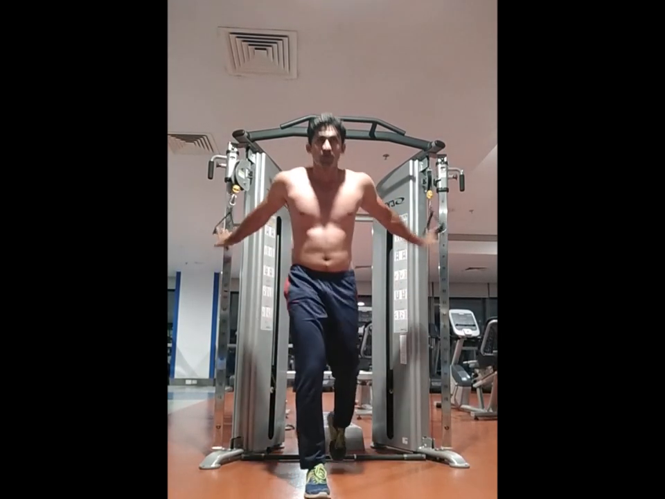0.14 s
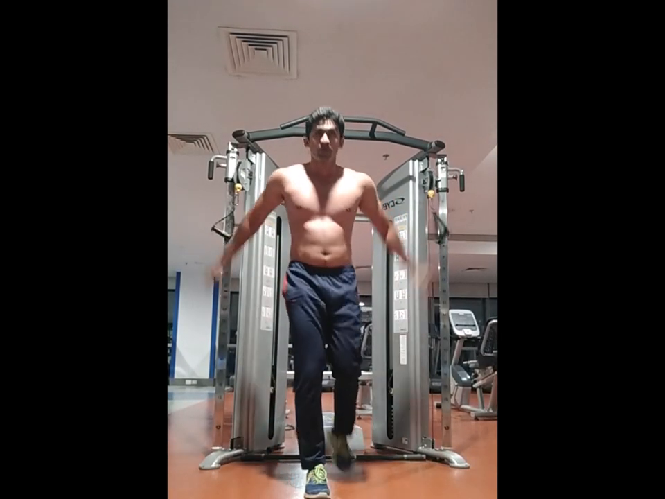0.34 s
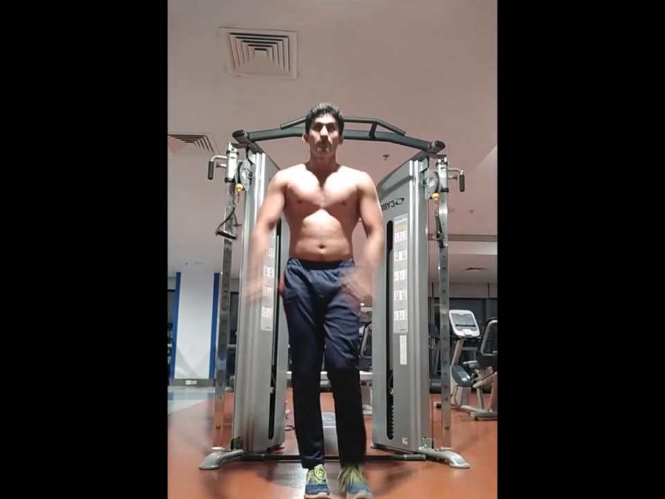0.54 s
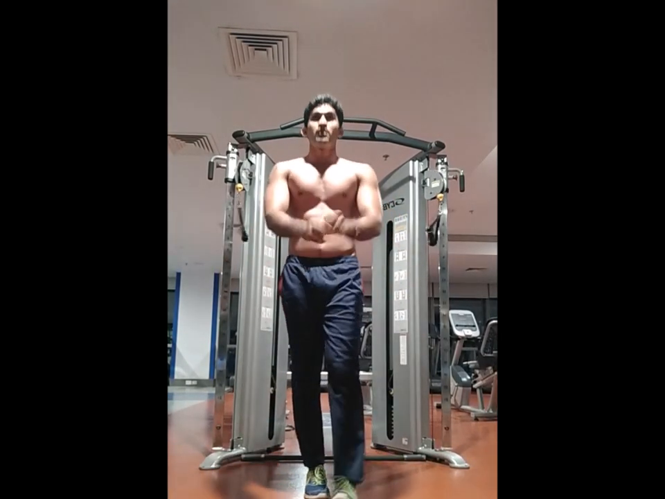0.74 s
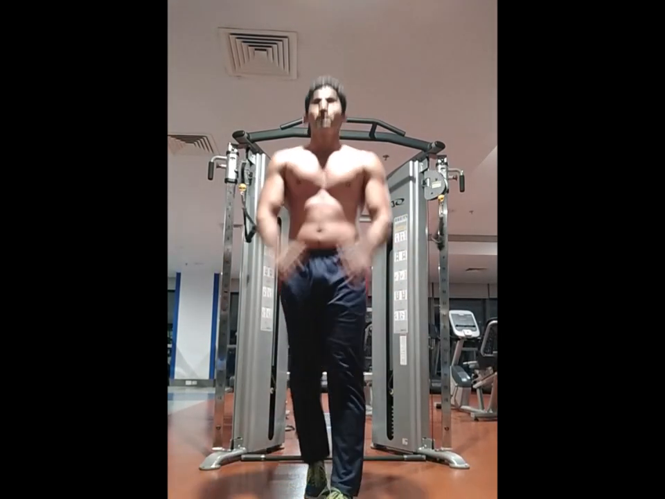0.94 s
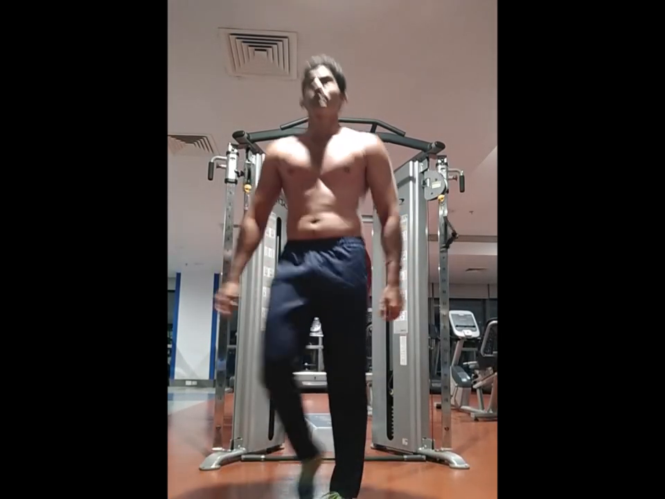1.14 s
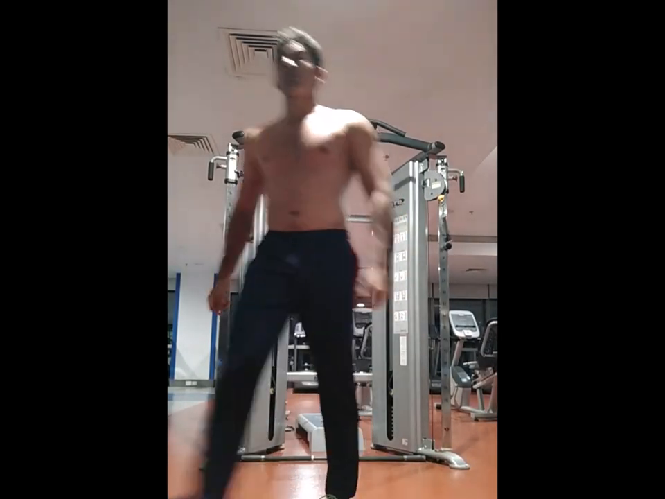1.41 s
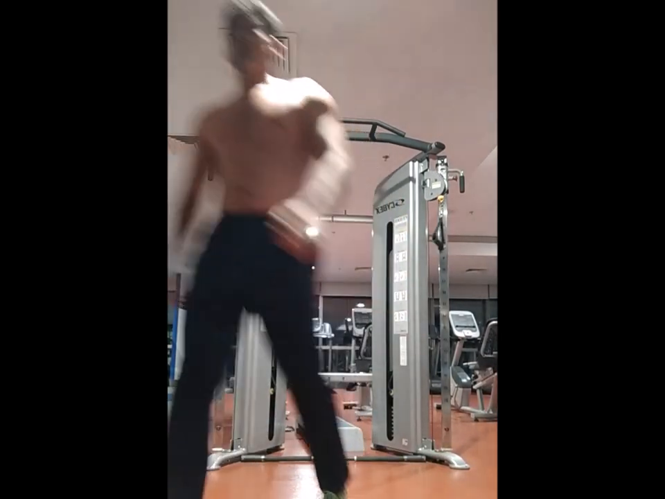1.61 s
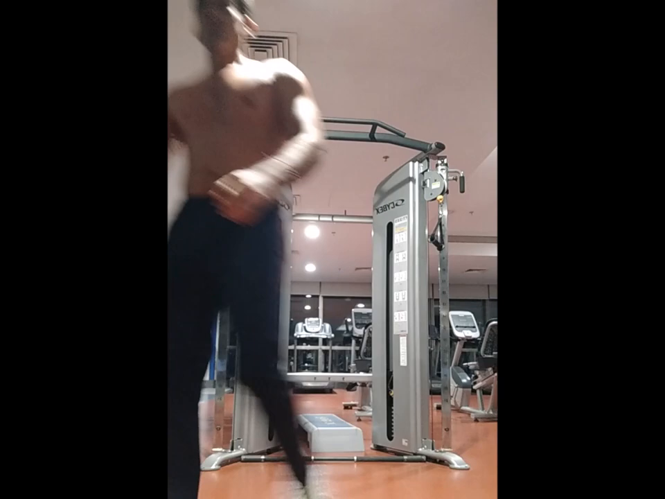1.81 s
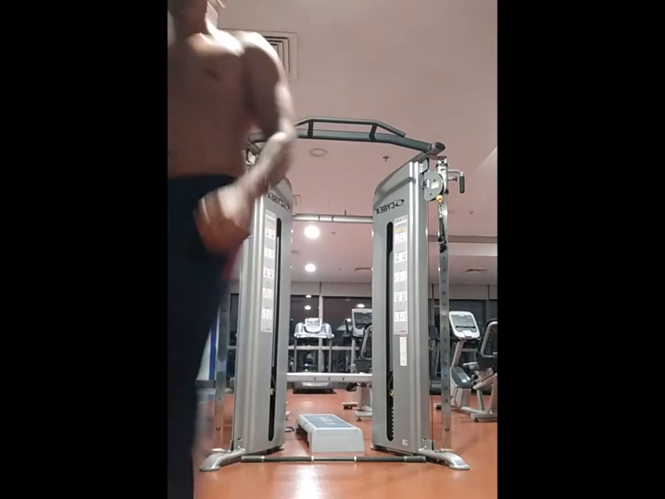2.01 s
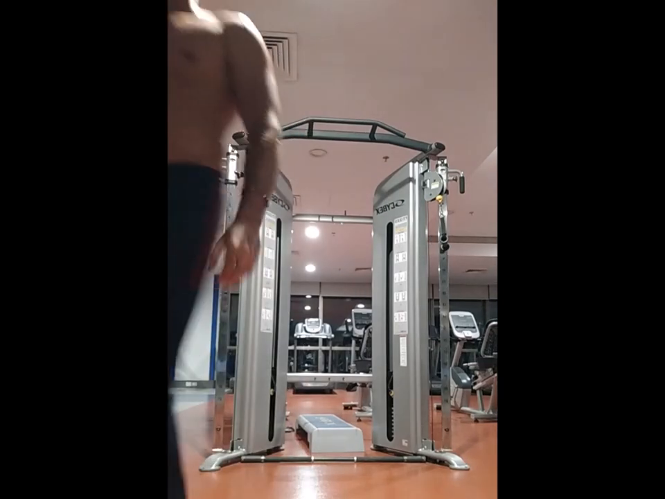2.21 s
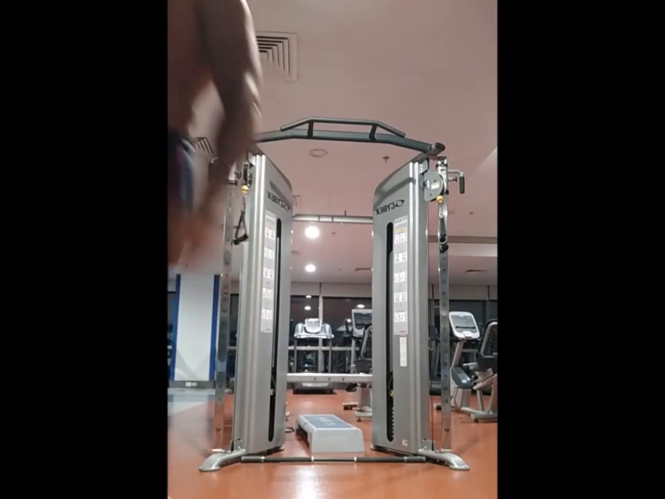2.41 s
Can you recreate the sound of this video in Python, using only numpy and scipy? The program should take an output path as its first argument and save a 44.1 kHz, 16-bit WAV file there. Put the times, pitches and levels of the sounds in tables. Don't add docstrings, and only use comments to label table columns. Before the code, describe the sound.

Loud metallic clank of gym cable machine handles released, weight plates landing, ringing in a large hard room

```python
import sys
import numpy as np
from scipy import signal
from scipy.fft import rfft, irfft, next_fast_len
from scipy.io import wavfile
from scipy.ndimage import uniform_filter1d

SR = 44100
rng = np.random.default_rng(int(sys.argv[2]) if len(sys.argv) > 2 else 0)


def elevation(decibels):
    levels = np.asarray(decibels, float)
    return 10 ** (levels / 20)


def transcribe(signal):
    frames = np.atleast_2d(signal).T
    limited = np.clip(frames, -1, 1)
    pcm = np.round(limited * 32767).astype(np.int16)
    wavfile.write(sys.argv[1], SR, pcm)


N = 112454
T = np.arange(N) / SR
M = next_fast_len(2 * N)
F = np.maximum(np.arange(M // 2 + 1) * SR / M, 1)


def curve(table, hz):
    points = np.array(table, float)
    return np.interp(np.log(hz), np.log(points[:, 0]), points[:, 1])


def colour(x, table, share=1):
    return irfft(rfft(x, M) * elevation(share * curve(table, F)), M)[..., :N]


def unit(x):
    return x / np.sqrt(np.mean(x ** 2))


def walk(rate_hz):
    hold = int(SR / rate_hz)
    steps = np.repeat(rng.standard_normal(N // hold + 1), hold)
    return 1.54 * uniform_filter1d(uniform_filter1d(steps, hold), hold)[:N]


def panned(x, pan_db):
    return x * elevation(np.array([[pan_db], [-pan_db]]) / 2)


def strike(hits, modes, crack, crack_s, push_s, scatter_db, chatter_db):
    detune, wobble_rad, chatter_hz = 0.001018, 0.89, 30
    out, mode_table = np.zeros((2, N)), np.array(modes, float)
    longest = int(SR * mode_table[:, 2].max()) + 4000
    chance = rng.standard_normal((len(hits), 2, len(modes)))
    wavers = [walk(chatter_hz) for _ in modes]
    noise = unit(colour(rng.standard_normal(N), crack))
    for (start_s, peak_db, crack_db, pan_db), (strength, tuning) in zip(hits, chance):
        i = int(start_s * SR)
        t = T[:min(N - i, longest)]
        here = slice(i, i + len(t))
        ring = 0
        for (hz, mode_db, t60_s), a, b, waver in zip(mode_table, strength, tuning, wavers):
            level = elevation(mode_db + scatter_db * a + chatter_db * waver[here])
            phase = 2 * np.pi * hz * (1 + detune * b) * t + wobble_rad * waver[::-1][here]
            ring = ring + level * np.sin(phase) * np.exp(-np.log(1000) * t / t60_s)
        burst = elevation(crack_db) * noise[here] * np.exp(-t / crack_s)
        push = 1 - np.exp(-t / push_s)
        out[:, here] += panned(elevation(peak_db) * (ring / 2 + burst) * push, pan_db)
    return out


# start_s, peak_db, crack_re_ring_db, pan_left_db
BAR_HITS = [
    (.2345, -27, -2, 4.8),
    (.2403, -21.5, -13, 3.3),
    (.2445, -24, -6, 3.6),
    (.3446, -28.5, -8, 3.4),
]
# pitch_hz, level_db, t60_s
BAR_MODES = [(1407.4, -14, 2), (1416, -8.5, 0.23), (1446, -3, 0.33), (1817, -8, 0.3), (1867, -9, 0.38),
             (2076, -7, 1), (2121, -11, 1.86), (2140, -2, 0.15), (2497, 4, 0.13), (2597, -9.5, 0.55),
             (3181, -16, 0.34), (4040, -10, 0.05), (4410, -10, 0.09)]
# freq_hz, density_db
STEEL_CRACK = [(80, -3.5), (500, -4.5), (1400, 7.5), (2500, -1), (4500, 2), (7000, -22), (11000, -25),
               (15500, -14)]


def weight_bar():
    return strike(BAR_HITS, BAR_MODES, STEEL_CRACK, crack_s=0.015, push_s=0.00079,
                  scatter_db=0.86, chatter_db=3.8)


# start_s, peak_db, crack_re_ring_db, pan_left_db
HOOK_HITS = [
    (.2800, -26.5, -8, 12),
    (.2872, -18, -3.5, 11.3),
    (.2950, -15, -14, 8),
]
# pitch_hz, level_db, t60_s
HOOK_MODES = [(2610, -7, 0.065), (4190, -6, 0.04), (10400, -10, 0.0066), (14200, -6, .008)]
# freq_hz, density_db
TAP_CRACK = [(200, -5), (1000, 0.5), (3000, -3), (6000, -10.5), (7500, -2), (10000, -11.5), (15500, -10.5)]


def hooks():
    return strike(HOOK_HITS, HOOK_MODES, TAP_CRACK, crack_s=0.005, push_s=0.002,
                  scatter_db=2.1, chatter_db=1.6)


# start_s, peak_db, crack_re_ring_db, pan_left_db
STACK_HITS = [
    (.3632, -21, -1, 1.4),
    (.3760, -28, 5.5, 0.93),
    (.396, -30.5, 1.5, 1),
    (.4540, -30, 5, 1.8),
    (.52, -34.5, 2.5, 2),
    (.5711, -36, 4, 2.6),
]
# pitch_hz, level_db, t60_s
STACK_MODES = [(415.5, -7, 0.17), (619, -6.5, 0.15), (653, -7, 0.23), (1005, -6.5, 0.2), (1130, -5, 0.21),
               (1185, -3, 0.18), (1518, 1.5, 0.082), (3397, 1.5, 0.15), (3436, -8.5, 0.28),
               (3540, -5, 0.092), (3910, -9, 0.15), (4250, -8.5, 0.08), (6400, -24, 0.05)]
# freq_hz, density_db
STACK_CRACK = [(80, -20.5), (400, -6), (1100, 2), (1700, 0), (2800, -11.5), (3700, -1.5), (6700, -15),
               (15500, -34)]


def plate_stack():
    return strike(STACK_HITS, STACK_MODES, STACK_CRACK, crack_s=0.012, push_s=0.00062,
                  scatter_db=0.7, chatter_db=4.37)


# start_s, peak_db, crack_re_ring_db, pan_left_db
CLIP_HITS = [
    (.1345, -31, -6.5, -3),
    (.1405, -32, -3.5, 7),
    (.192, -39.5, 8, -11),
]
# pitch_hz, level_db, t60_s
CLIP_MODES = [(790, 4, 0.06), (955, 10, 0.03), (1550, -22, 0.025), (2750, -2, 0.075), (3660, 2, 0.037),
              (5560, 4, 0.027)]


def cable_clips():
    return strike(CLIP_HITS, CLIP_MODES, STEEL_CRACK, crack_s=0.0097, push_s=0.0034,
                  scatter_db=2.2, chatter_db=2.16)


# start_s, peak_db, crack_re_ring_db, pan_left_db
SLACK_HITS = [
    (.0915, -42.5, -13, 11),
    (.120, -43, -1, 9.1),
]
# pitch_hz, level_db, t60_s
SLACK_MODES = [(1310, 7, 0.095), (2700, -15, 0.12)]


def slack_parts():
    return strike(SLACK_HITS, SLACK_MODES, STEEL_CRACK, crack_s=0.0072, push_s=0.0033,
                  scatter_db=2.7, chatter_db=1.9)


# start_s, peak_db, crack_re_ring_db, pan_left_db
TAP_HITS = [
    (1.0115, -36, -10, 8.3),
    (1.5105, -41, -9.5, 4.5),
    (1.9789, -50.5, -10, 7.9),
    (2.3481, -48.5, -12, 2.5),
]
# pitch_hz, level_db, t60_s
TAP_MODES = [(3430, 1.5, 0.015), (3680, 1.5, 0.031), (4440, -4, 0.024), (5800, 2.5, 0.0092),
             (13800, -12.5, .02)]


def handle_taps():
    return strike(TAP_HITS, TAP_MODES, TAP_CRACK, crack_s=0.011, push_s=0.00094,
                  scatter_db=1.5, chatter_db=0.74)


# start_s, peak_db, crack_re_ring_db, pan_left_db
THUD_HITS = [
    (.071, -47, -1, .1),
    (.199, -45.5, 4, .1),
    (.273, -35.5, -20, .1),
    (.375, -33, -18, .1),
    (.455, -31, -10.5, .1),
    (1.020, -36, -9.5, 0.13),
    (1.088, -40.5, -2.5, 0.091),
    (1.188, -46.5, -12, .1),
    (1.53, -46, -3.5, 0.072),
]
# pitch_hz, level_db, t60_s
THUD_MODES = [(95, -9, 0.088), (239, 1.5, 0.052), (298, 1, 0.064), (441.5, 7.5, 0.082), (545, 6.5, 0.07),
              (639, 3.5, 0.057), (1057, 1.5, 0.043)]
# freq_hz, density_db
THUD_CRACK = [(60, -24), (200, -2), (600, -4), (1200, -13.5), (3000, -20), (15500, -81)]


def frame_thuds():
    return strike(THUD_HITS, THUD_MODES, THUD_CRACK, crack_s=0.02, push_s=0.0037,
                  scatter_db=2.76, chatter_db=2.9)


# start_s, rise_s, fall_s, level_db
RATTLES = [
    (.03, 0.023, 0.087, -56.5),
    (0.129, 0.0093, 0.12, -42.5),
    (0.235, 0.016, 0.039, -28),
    (0.271, 0.01, 0.017, -27),
    (0.361, 0.0016, 0.055, -31.5),
    (1.005, 0.0062, 0.012, -44.5),
    (1.504, 0.0036, 0.028, -47),
    (1.974, 0.0044, 0.035, -73),
]
# freq_hz, density_db
RATTLE_COLOUR = [(500, -33.5), (2500, -2), (4000, -2.5), (6000, -0.5), (9000, -8.5), (14000, -4),
                 (15500, 1)]


def rattle():
    clicks_per_s, spread_db = 6000, 1
    struck = rng.random(N) < clicks_per_s / SR
    sizes = elevation(spread_db * rng.exponential(size=N)) * rng.standard_normal(N)
    env = 0
    for start_s, rise_s, fall_s, level_db in RATTLES:
        t = np.maximum(T - start_s, 0)
        env = env + elevation(level_db) * (1 - np.exp(-t / rise_s)) * np.exp(-t / fall_s)
    return panned(env * unit(colour(struck * sizes, RATTLE_COLOUR)), pan_db=8.9)


def swells(table, skew, lag_rad, pan_db):
    out, wobble = np.zeros((2, N)), 0.48 * walk(39.9)
    for start_s, level_db, pitch_hz, length_s in table:
        i = int(start_s * SR)
        u = T[:min(N - i, int(1.5 * SR * length_s))] / length_s
        here = slice(i, i + len(u))
        lag = lag_rad * np.array([[-.5], [.5]])
        phase = 2 * np.pi * pitch_hz * length_s * u + wobble[here] + lag
        swell = np.sin(np.pi * np.clip(u / 1.42, 0, 1) ** skew)
        out[:, here] += elevation(level_db + 3.8 * wobble[::-1][here]) * swell * np.sin(phase)
    return panned(out, pan_db)


# start_s, level_db, pitch_hz, length_s
RINGS = [(.184, -40, 2630, 0.041), (.236, -26, 1415, .022), (.2395, -16, 2116, 0.023),
         (.282, -25, 10700, 0.012), (.2865, -21.5, 2597, 0.015), (.287, -25, 14000, 0.014),
         (.288, -25, 1900, 0.021), (.295, -27, 1416, 0.052), (.342, -23, 2120, 0.0335),
         (.3632, -23.5, 3426, 0.072), (.368, -28.5, 1418, .1), (.40, -26, 2130, 0.092),
         (.51, -29.5, 2112, 0.096), (.565, -34, 3387, 0.15), (.639, -31, 2123, 0.081),
         (.641, -34.5, 1426, 0.087), (.72, -37.5, 1170, 0.072), (.835, -37.5, 2122, 0.098),
         (.84, -36.5, 1407, 0.11), (.96, -53.5, 2121, 0.4), (1.011, -36, 5800, 0.0045),
         (1.1, -39.5, 3400, .008), (1.11, -56.5, 1408, 0.47), (1.511, -49, 3680, 0.0098),
         (1.527, -66, 6350, 0.15), (1.979, -53, 3680, .008)]


def steel_rings():
    return swells(RINGS, skew=0.37, lag_rad=1.62, pan_db=3.6)


# start_s, level_db, pitch_hz, length_s
BOOMS = [(0, -45, 242, 0.026), (0.074, -48.5, 234, 0.036), (0.194, -49.5, 226, 0.054),
         (.275, -40, 252.6, .045), (.315, -43, 95, 0.041), (0.378, -37, 440, 0.031),
         (0.442, -48, 97.6, 0.029), (.452, -29, 423.4, 0.039), (0.449, -33, 619, 0.055),
         (0.506, -40, 633, .06), (0.508, -42, 226.3, 0.078), (.59, -39.5, 417.2, 0.068),
         (0.648, -40, 421, 0.1), (0.845, -49, 653, 0.025), (0.863, -44.5, 416, .05),
         (1.018, -37, 431, 0.031), (1.045, -42.5, 230, 0.057), (1.079, -39.5, 564, 0.018),
         (1.098, -41.5, 425, .03), (1.133, -43, 566, 0.024), (1.129, -39, 246, 0.019),
         (1.184, -44.5, 529, 0.031), (1.205, -47.5, 216, 0.013), (1.247, -44, 545, 0.022),
         (1.263, -42, 421, 0.029), (1.38, -47, 417, 0.047), (1.524, -45, 438.7, 0.027),
         (1.533, -49, 280, 0.02), (1.57, -51, 215, .025), (1.602, -48.5, 603, 0.017),
         (1.633, -52, 545, 0.024), (2.031, -47, 231, 0.026), (2.164, -52, 240, 0.018),
         (2.46, -57.5, 153, 0.028)]


def frame_booms():
    return swells(BOOMS, skew=0.64, lag_rad=0.37, pan_db=1.1)


# freq_hz, side_re_mid_db
PORT_SIDE = [(60, -13), (300, -13), (600, -9), (1200, 3), (2200, -1), (4000, 2), (15000, 0.7)]


def ports(mid, side):
    side = colour(side, PORT_SIDE)
    return np.array([mid + side, mid - side]) / np.sqrt(2)


# freq_hz, t60_s
ROOM_T60 = [(60, 1.3), (250, 1.97), (1000, 1.76), (2000, 1.16), (4000, 1.307), (8000, 0.68), (15000, 0.3)]


def room(x):
    gain_db, rise_s = 3, 0.003
    spec, tail = rfft(ports(*rng.standard_normal((2, N))), M), 0
    for hz in 40 * 2 ** np.arange(0, 9.1):
        band = np.cos(np.pi / 2 * np.clip(np.log2(F / hz), -1, 1)) ** 2
        decay = np.exp(-np.log(1000) * T / curve(ROOM_T60, hz))
        tail = tail + irfft(spec * band, M)[:, :N] * decay
    tail = tail * (1 - np.exp(-T / rise_s)) / np.sqrt(SR / 10)
    return elevation(gain_db) * irfft(rfft(tail, M) * rfft(x, M), M)[:, :N]


# start_s, length_s, level_db
CHIRPS = [
    (-.14, 0.2, -56),
    (0.703, 0.19, -70),
    (1.186, 0.15, -64),
    (1.316, 0.28, -54),
    (1.978, 0.27, -53.5),
]


def cricket():
    pitch_hz, syllable_hz, drone_hz, drone_db = 4045, 25.44, 4029, -68
    env = np.zeros(N)
    for start_s, length_s, level_db in CHIRPS:
        u = np.clip((T - start_s) / length_s, 0, 1)
        syllables = np.sin(np.pi * syllable_hz * (T - start_s)) ** 2
        env += elevation(level_db) * np.sin(np.pi * u) ** 0.43 * syllables
    near = env * np.sin(2 * np.pi * pitch_hz * T + 0.99 * walk(18))
    drone = elevation(drone_db + 0.55 * walk(5.64)) * np.sin(2 * np.pi * drone_hz * T + 1.16 * walk(9.7))
    return panned(near + drone, pan_db=9.5)


# freq_hz, density_db
AIR = [(15, -35.5), (25, -17), (107, -3.5), (324, -7), (557, -2), (2520, -19.5), (4100, -26), (8050, -36),
       (15800, -33.5)]


def ventilation():
    level_db, swell_db, flicker_db = -53.5, 1.82, 2.0
    out, swell = 0, walk(1.36)
    spec = rfft(ports(*colour(rng.standard_normal((2, N)), AIR)), M)
    for hz in 25 * 2 ** np.arange(0, 9.6, .5):
        band = np.cos(np.pi / 2 * np.clip(2 * np.log2(F / hz), -1, 1)) ** 2
        gain = elevation(swell_db * swell + flicker_db * walk(9))
        out = out + gain * irfft(spec * band, M)[:, :N]
    return unit(out) * elevation(level_db)


def scene():
    near = (weight_bar() + hooks() + plate_stack() + cable_clips() + slack_parts()
            + handle_taps() + frame_thuds() + rattle())
    echo = room(near.mean(axis=0))
    return near + echo + steel_rings() + frame_booms() + cricket() + ventilation()


# freq_hz, left_re_right_db
PORT_BALANCE = [(60, 0.5), (300, -1), (1200, 5.5), (4000, 3.5), (7000, -0.5), (9000, 5), (15000, 10)]
# freq_hz, gain_db
MIC = [(25, -20), (80, -0.8), (6600, -1.3), (7600, -13.5), (8600, -5), (15400, 0.8), (15850, -59)]


def microphone(dry):
    left = colour(dry[0], PORT_BALANCE, 0.23)
    right = colour(dry[1], PORT_BALANCE, -0.64)
    return colour(np.array([left, right]), MIC)


def roll_off(x):
    return signal.sosfilt(signal.butter(12, 16080, fs=SR, output="sos"), x)


def record(dry):
    mix = microphone(dry)
    return roll_off(mix)


dry = scene()
out = record(dry)
transcribe(out)
```